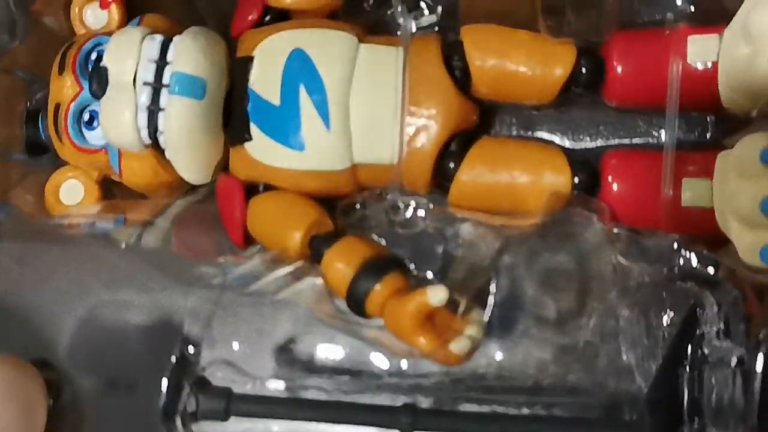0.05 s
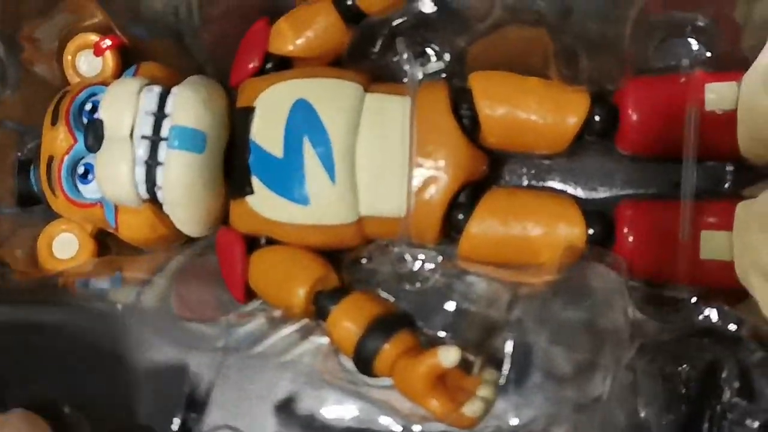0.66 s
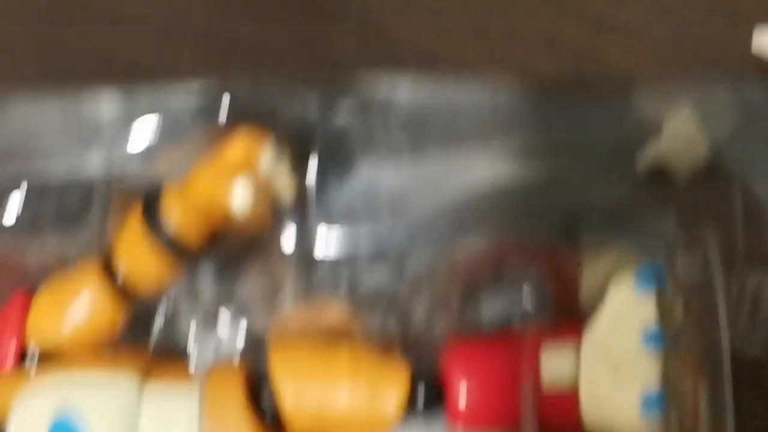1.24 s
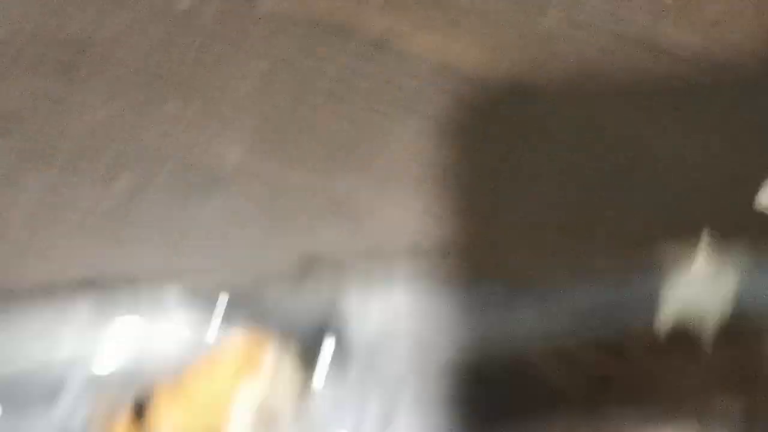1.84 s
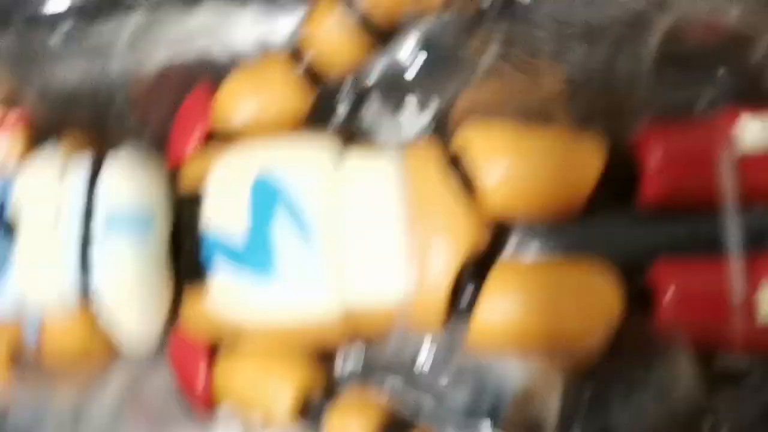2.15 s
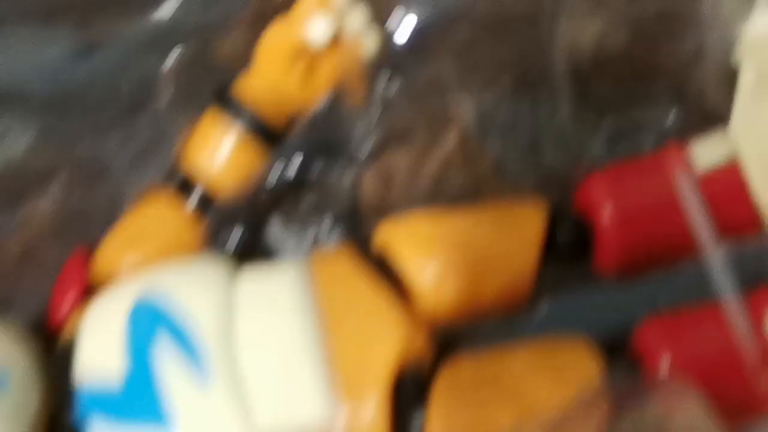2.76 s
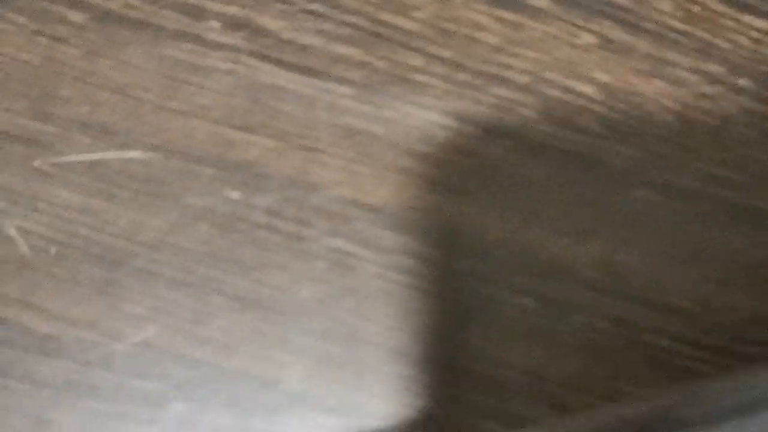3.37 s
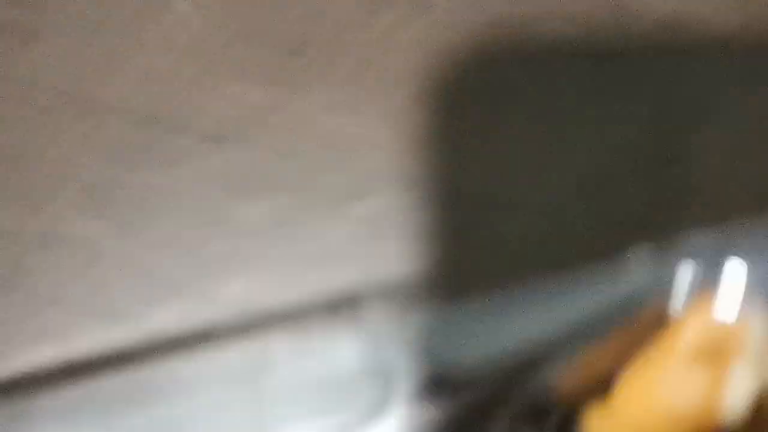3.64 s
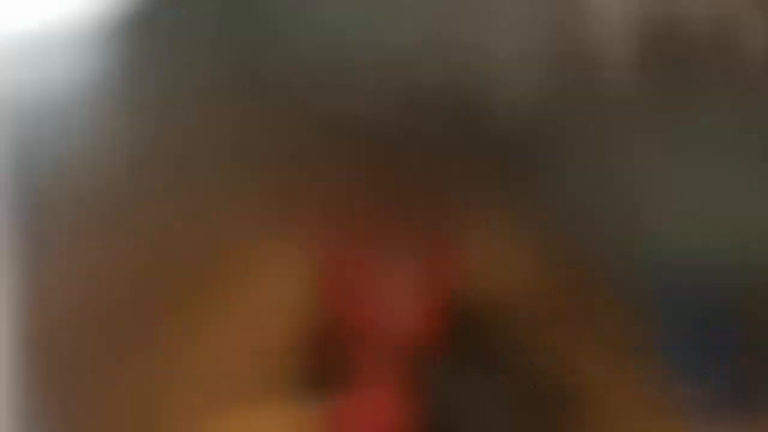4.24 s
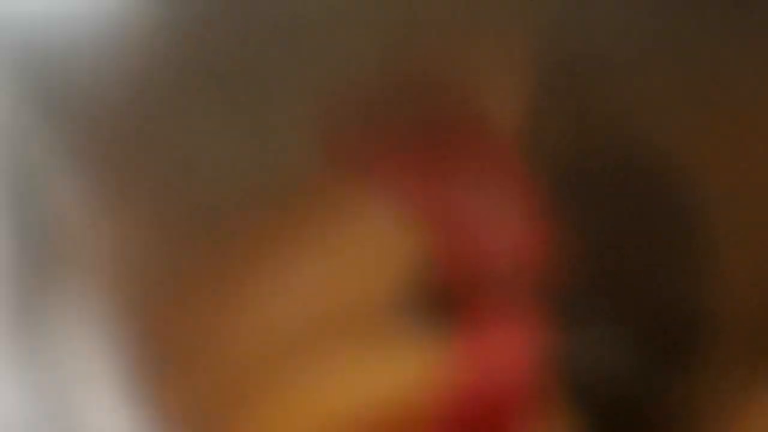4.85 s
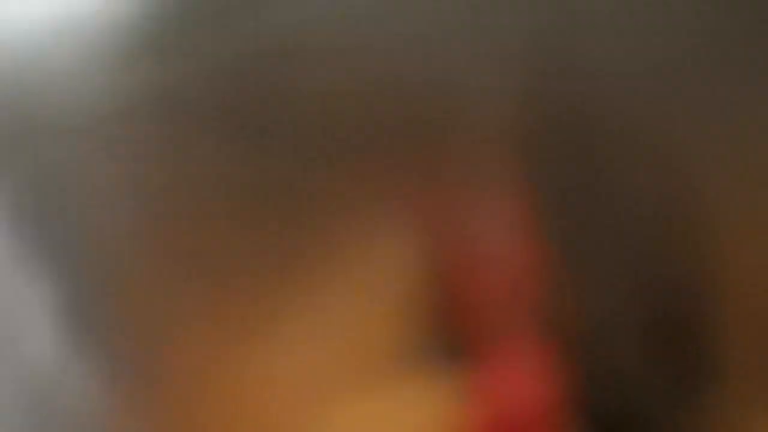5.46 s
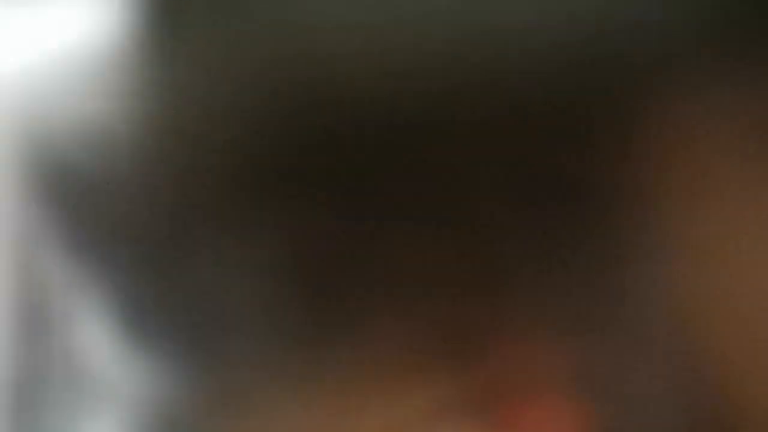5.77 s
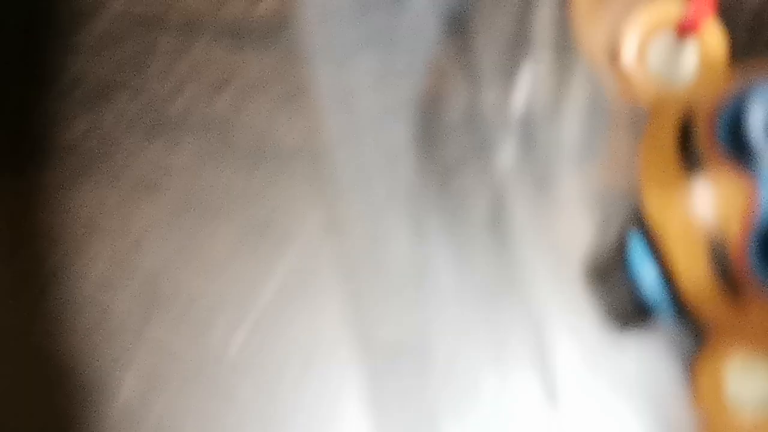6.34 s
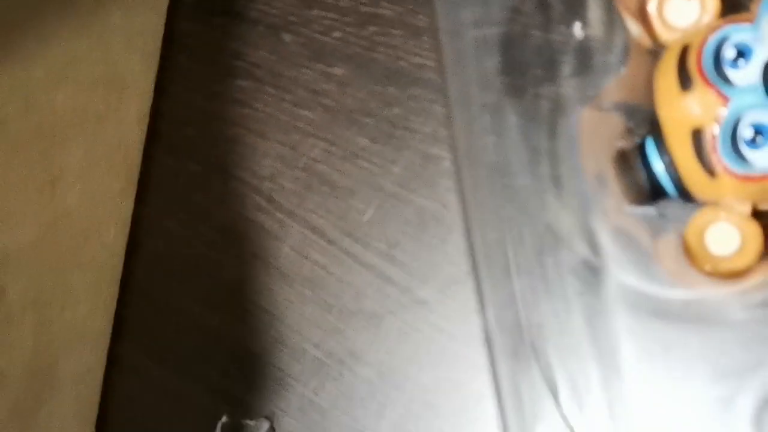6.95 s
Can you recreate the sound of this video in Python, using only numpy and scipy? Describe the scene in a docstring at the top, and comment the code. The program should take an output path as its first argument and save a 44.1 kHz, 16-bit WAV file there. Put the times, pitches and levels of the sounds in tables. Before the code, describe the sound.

A thin plastic tray holding a toy figure is handled in a small room over faint, low room tone. For the first two seconds there are only a few light ticks and short scrapes. From about 2 to 2.8 seconds comes a cluster of louder scrapes, with soft rubbing as fingers slide over the plastic. After a brief lull, steady crinkling starts at about 3.2 seconds, full of small, sharp snaps. From around 4 seconds the tray is right at the microphone and sounds fuller, with soft, dull handling bumps and a couple of louder pops near 4.5 seconds, briefly toward the right. The crackling is densest between about 5.3 and 6 seconds. A last strong scrape, pop and thud come just after 6 seconds, then the crinkling stops abruptly, leaving only room tone until the end at about 7 seconds.

```python
"""Short plastic scrapes and snaps sound over faint room tone: hands turn a thin blister tray near a phone.
The toy inside and the fingers scrape by stick-slip friction; creases snap by buckling.
Both excite the damped modes of the tray's panels and walls, and a small room echoes them.
The tray comes closer and is squeezed harder, so the crinkling thickens; it stops when the tray is let go."""
import sys
import numpy as np
from scipy import signal
from scipy.fft import rfft, irfft
from scipy.io import wavfile

SR = 44100
rng = np.random.default_rng(int(sys.argv[2]) if len(sys.argv) > 2 else 0)


def to_wav(s):
    """Save 16-bit WAV."""
    ch = np.atleast_2d(s).T  # columns
    pcm = np.round(np.clip(ch, -1, 1) * 32767)  # PCM
    wavfile.write(sys.argv[1], SR, pcm.astype(np.int16))


N = 313098
SIZE = 12288  # samples in one short sound
T, AGE = np.arange(N) / SR, np.arange(SIZE) / SR


def undb(db):
    """Amplitude ratio of a level in decibels."""
    return 10 ** (np.asarray(db) / 20)


def unit(x):
    """Normalisation of each channel to unit energy."""
    return x / np.sqrt(np.sum(x ** 2, axis=-1, keepdims=True))


def fade(t, t60):
    """Exponential decay, 60 dB in t60 seconds."""
    return np.exp(-np.log(1000) * t / t60)


def at(curve, t, column=1):
    """Linear interpolation of a curve at time t."""
    columns = np.transpose(curve)
    return np.interp(t, columns[0], columns[column])


def colour(points, size):
    """Magnitude response per FFT bin, interpolated in dB over log frequency."""
    hz, db = np.transpose(points)
    bin_hz = np.arange(size // 2 + 1) * SR / size
    return undb(np.interp(np.log(bin_hz + 1), np.log(hz), db))


def add(out, t, sound, db, pan_db):
    """Constant-power panning of a sound starting at t, with the energy of 10 ms at level db."""
    gains = undb(np.array([[pan_db], [-pan_db]]) / 2)
    gains /= np.sqrt(np.mean(gains ** 2))
    i = int(t * SR)
    out[:, i:i + SIZE] += (unit(sound) * gains * undb(db) * np.sqrt(SR / 100))[:, :N - i]


# spectrum of the room tone: [f/Hz, relative level/dB]
ROOM_SPECTRUM = [(25, 0.5), (140, -1.5), (250, -3), (450, -9), (1000, -13.5), (1500, -22.5), (3000, -25),
                 (4000, -33.5), (5200, -25.5), (7300, -30), (8500, -39), (15000, -37)]
def room_tone(shared=0.8, db=-68):
    """Stationary noise, low with a faint hiss, partly coherent between the channels."""
    noise = rng.standard_normal((3, N))
    spectrum = rfft(noise[:2] + shared * noise[2]) * colour(ROOM_SPECTRUM, N)
    return unit(irfft(spectrum, N)) * np.sqrt(N) * undb(db)


# soft knocks: [t/s, level/dB, f/Hz, t60/s]
BUMPS = [(.914, -54, 59.5, 0.12), (3.262, -50.5, 80, 0.19), (4.15, -46.5, 45, 0.29),
         (4.263, -48, 91.5, 0.14), (4.32, -44, 240, 0.066), (4.541, -32, 140, 0.036),
         (4.815, -43, 190, 0.091), (4.941, -43.5, 330, 0.037), (5.33, -42.5, 140, .15),
         (5.47, -39.5, 190, 0.41), (5.599, -46.5, 159, 0.25), (5.783, -54, 45, 0.2),
         (6.046, -37.5, 79.6, 0.13)]
def bumps():
    """Structure-borne sound: hands and tray meet the phone in dull, damped thuds."""
    out = np.zeros((2, N))
    for t, db, hz, t60 in BUMPS:
        push = rng.standard_normal((2, SIZE)) * fade(AGE, t60)
        band = signal.butter(2, [hz / 2.7, hz * 1.58], "band", fs=SR, output="sos")
        add(out, t, signal.sosfilt(band, push), db, pan_db=-4.5)
    return out


# path of the tray: [t/s, nearness from 0 at arm's length to 1 at the phone]
NEARNESS = [(2.6, 0), (3.8, 0.77), (4.3, 1), (5.8, 0.97), (6.1, 0.81)]
def shade_treble(x, far_loss=0.24):
    """Directivity: short waves miss the microphones off axis while the tray is far."""
    treble = signal.sosfiltfilt(signal.butter(2, 9000, "high", fs=SR, output="sos"), x)
    return x - far_loss * (1 - at(NEARNESS, T)) * treble


# side the tray is held on: [t/s, left minus right level/dB]
BEARING = [(0, 3.5), (2.6, 3), (4.0, 4.5), (4.38, -2.5), (4.58, -9.5), (4.78, -1.5), (5.6, -1), (6.05, -3)]
def spot_pan(t, spread_db=2.5):
    """Level difference of a random spot on the tray, which subtends a wider angle when close."""
    return at(BEARING, t) + spread_db * at(NEARNESS, t) * rng.standard_normal()


# imbalance of the microphone ports: [f/Hz, left minus right level/dB]
PORT_BALANCE = [(200, -3), (400, -3.5), (600, 3), (950, 4), (1400, -1), (2400, -1), (6500, 1.5), (10500, 0)]
def ports(x):
    """Acoustic filtering: each port colours the tray differently, at constant total power."""
    lean = np.sqrt(colour(PORT_BALANCE, N))
    rms = np.sqrt((lean ** 2 + lean ** -2) / 2)
    return irfft(rfft(x) * np.array([lean, 1 / lean]) / rms, N)


# resonances of the plastic sheet: [f/Hz, relative level/dB]
SHEET_SPECTRUM = [(190, -4.5), (280, -5), (400, -1), (520, -5.5), (740, 1.5), (980, 1.5), (1400, -8),
                  (1750, -6), (2540, -8.5), (3200, -9), (4000, -18.5), (5300, -10), (7200, -10.5),
                  (8800, -21), (11500, -27.5), (15000, -29.5)]
def response(part):
    """Minimum-phase response of the sheet, limited to the band of one part."""
    cepstrum = irfft(np.log(colour(SHEET_SPECTRUM, SIZE)))
    cepstrum[1:SIZE // 2] *= 2  # folding makes the response causal
    cepstrum[SIZE // 2 + 1:] = 0
    band = signal.butter(4, part[:2], "band", fs=SR, output="sos")
    return np.exp(rfft(cepstrum)) * rfft(signal.sosfilt(band, signal.unit_impulse(SIZE)))


# vibrating parts of the tray: [low f/Hz, high f/Hz, strongest mode f/Hz, t60/s, echo level/dB]
SHELL = (127, 639, 406.5, 0.25, -15.5)
PANEL = (481, 1500, 772, 0.0051, -10.5)
WALL = (1199.5, 4298.5, 2549, 0.0375, -18)
CREASE = (3699, 15999.5, 6595.5, 0.014, -19.5)
PARTS = SHELL, PANEL, WALL, CREASE
def ring(part, tone, extra_echo_db=0, peak=1.2, q=8, room_t60_s=0.23, room_gap_s=0.012):
    """Modal overlap: one spot's spectrum is decaying noise with one stronger mode and the room's echo."""
    mode_hz, t60, echo_db = part[2:]
    noise = rng.standard_normal((2, SIZE))  # the tray moves, so every echo pattern is new
    crack = 0.47 * fade(AGE, t60=0.0055)
    onset = 1 - fade(AGE, t60=0.0012)  # the sheet takes a moment to flip
    direct = unit((fade(AGE, t60) + crack) * onset)
    echo = undb(echo_db + extra_echo_db) * unit(fade(AGE, room_t60_s) * (AGE > room_gap_s))
    bent_hz = mode_hz * 2 ** rng.uniform(-0.38, 0.32)  # bending retunes the mode
    s = 1j * np.arange(SIZE // 2 + 1) * SR / SIZE / bent_hz
    resonance = 1 + peak * s / (s + q * (s * s + 1))
    return tone * resonance * rfft(noise * np.hypot(direct, echo))


def slips(size, per_s, spread_db):
    """Poisson impulses of log-normal strength: most small, a few large."""
    occurs = rng.random(size) < per_s / SR
    return occurs * undb(spread_db * rng.standard_normal(size)) * rng.choice([-1, 1], size)


def rubbing(part, tone, db):
    """Friction noise: dense tiny slips convolved with the impulse responses of three spots."""
    out = np.zeros((2, N))
    for _ in range(3):
        force = slips(N, per_s=1500, spread_db=6.5)
        out += signal.oaconvolve(force[None], irfft(ring(part, tone, peak=0)), axes=1)[:, :N]
    return unit(out) * np.sqrt(N) * undb(db)


# a finger slides over the sheet: [t/s, duration/s, panel level/dB, crease level/dB]
STROKES = [(0.625, 0.26, -66, -76), (0.944, 0.04, -63, -67), (1.995, 0.2, -55.5, -60),
           (2.269, 0.29, -59, -61.5), (2.691, 0.17, -60.5, -66), (3.168, .42, -61, -66.5),
           (3.751, 0.14, -55, -66), (4.04, 0.17, -62, -61.5), (4.29, 0.054, -58.5, -60.5),
           (4.698, 0.42, -63.5, -67.5), (5.304, 0.37, -56, -56), (5.696, 0.38, -54, -61.5)]
def strokes(tones, attack_s=0.023, t60_s=0.38, shell_db=-6, wall_db=-2):
    """Sliding friction drives every part of the tray; overlapping strokes add in power."""
    panel, crease = np.full((2, N), 1e-7)
    for t, length, panel_db, crease_db in STROKES:
        contact = np.clip((T - t) / attack_s, 0, 1) * fade(np.maximum(T - t - length, 0), t60_s)
        panel = np.hypot(panel, contact * undb(panel_db))
        crease = np.hypot(crease, contact * undb(crease_db))
    panel, crease = 20 * np.log10([panel, crease])
    levels = panel + shell_db, panel, (panel + crease) / 2 + wall_db, crease
    pan_db = at(BEARING, T)
    return sum(map(rubbing, PARTS, tones, levels)) * undb(np.array([pan_db, -pan_db]) / 2)


# strength of the squeeze: [t/s, buckling rate/(1/s), level/dB]
SQUEEZE = [(0, 4.5, -68.5), (3.15, 1.5, -68.5), (3.25, 55, -58), (4.2, 25, -60), (4.7, 30, -57.5),
           (5.2, 55, -55.5), (5.6, 150, -51.5), (6.08, 29.5, -58), (6.12, 0, -67)]
def crinkle(wall_tone, crease_tone, coupling=0.43, spread_db=3, pan_spread_db=6):
    """Crackling noise: tiny creases buckle and nudge a wall, faster and louder under a harder grip."""
    out = np.zeros((2, N))
    for t in T[rng.random(N) < at(SQUEEZE, T) / SR]:
        pop = irfft(ring(CREASE, crease_tone) + coupling * ring(WALL, wall_tone))
        db = at(SQUEEZE, t, column=2) + spread_db * rng.standard_normal()
        pan_db = at(BEARING, t) + pan_spread_db * rng.standard_normal()
        add(out, t, pop, db, pan_db)
    return out


# toy or fingers catch on the sheet: [t/s, duration/s, panel level/dB, crease level/dB]
SCRAPES = [(0.104, 0.02, -47.5, -59), (0.415, 0.012, -56, -79), (0.677, 0.048, -40.5, -52.5),
           (1.591, 0.034, -53.5, -54), (1.767, 0.018, -58.5, -91), (2.032, 0.021, -40, -63),
           (2.114, 0.059, -38, -48), (2.392, 0.038, -31, -53), (2.44, 0.061, -31.5, -55),
           (2.546, 0.038, -28.5, -48), (2.7, .014, -48, -93), (2.737, 0.063, -35.5, -51),
           (2.831, 0.028, -49.5, -78), (3.054, 0.0078, -60, -89), (3.264, .013, -34.5, -61),
           (3.592, 0.036, -48, -59), (3.765, 0.0078, -34.5, -70), (3.793, 0.026, -39.5, -49),
           (4.107, 0.017, -40.5, -63), (4.182, 0.017, -35.5, -60.5), (4.312, 0.016, -38.5, -49),
           (4.366, .015, -40.5, -40.5), (4.494, .016, -37.5, -53), (4.538, 0.026, -35, -60),
           (4.576, 0.0084, -31.5, -35), (4.772, 0.013, -33.5, -45.5), (4.809, 0.022, -39, -61),
           (4.881, .012, -43, -75), (4.936, 0.0073, -38.5, -65), (5.082, 0.011, -34, -42),
           (5.324, 0.012, -34, -44), (5.382, 0.017, -36.5, -41.5), (5.429, 0.033, -37, -60),
           (5.498, 0.017, -33, -54), (5.548, 0.013, -32.5, -47.5), (5.593, 0.011, -30, -41),
           (5.755, 0.013, -42, -58), (5.858, 0.016, -37, -36.5), (5.888, .052, -32, -44),
           (6.006, 0.034, -35.5, -43.5), (6.036, .02, -26, -36), (6.055, 0.017, -37, -62),
           (6.156, 0.015, -44.5, -82)]
def scrapes(tones, shell_far_db=-21.5, shell_near_db=-3, wall_db=0.5):
    """Stick-slip friction: one run of slips swells and dies, shaking all parts of the tray."""
    out = np.zeros((2, N))
    for t, length, panel, crease in SCRAPES:
        progress = np.clip(AGE / length, 0, 1)
        pressure = np.sqrt(np.sin(np.pi * progress ** 0.65).clip(0))
        force = pressure * slips(SIZE, per_s=2500, spread_db=4)
        force[0] += 0.3  # the first slip breaks the grip
        # the bass of the whole shell only carries close up
        shell = panel + shell_far_db + (shell_near_db - shell_far_db) * at(NEARNESS, t)
        levels = shell, panel, (panel + crease) / 2 + wall_db, crease
        pan_db = spot_pan(t)
        for part, tone, db in zip(PARTS, tones, levels):
            add(out, t, irfft(rfft(force) * ring(part, tone)), db, pan_db)
    return out


# a crease buckles: [t/s, panel level/dB, crease level/dB]
CREASE_SNAPS = [(0.378, -49, -49.5), (.6433, -51.5, -65.5), (.8362, -53.5, -57), (0.914, -56, -61),
                (0.9585, -75, -56.5), (1.221, -50, -40.5), (1.447, -76, -62.5), (1.5644, -57.5, -54.5),
                (1.589, -49, -49.5), (2.0076, -60.5, -54.5), (2.395, -30, -49.5), (2.8645, -60, -47.5),
                (3.212, -43.5, -46.5), (3.232, -41, -46.5), (3.327, -44, -44), (3.3694, -44.5, -45),
                (3.3968, -50, -54), (3.4203, -47, -48.5), (3.462, -44, -48), (3.4953, -46.5, -46.5),
                (3.5289, -46, -48), (3.6482, -44, -47.5), (3.7404, -41, -45), (3.7949, -37, -44),
                (3.8854, -38, -59.5), (3.9579, -79, -37), (3.9966, -58, -35.5), (4.0583, -71, -48.5),
                (4.186, -33.5, -62), (4.2984, -51, -45), (4.3714, -39, -39.5), (4.3823, -50, -49),
                (4.404, -41, -45), (4.4973, -34, -40.5), (4.526, -34.5, -41.5), (4.5391, -36, -43),
                (4.6744, -53.5, -48), (4.7041, -47.5, -52), (4.7311, -53, -41), (4.7496, -50, -44),
                (4.7586, -39.5, -40), (4.8683, -48.5, -41), (4.9334, -52, -43.5), (4.9679, -67.5, -47),
                (4.9789, -48.5, -45), (4.994, -66, -45), (5.0223, -46, -39.5), (5.053, -48.5, -40.5),
                (5.0706, -48, -44), (5.0858, -28, -39), (5.1208, -54, -47.5), (5.187, -45.5, -40),
                (5.2049, -48.5, -45.5), (5.2314, -44.5, -41), (5.2524, -36, -41), (5.279, -54, -37.5),
                (5.3251, -39.5, -39.5), (5.3815, -35, -39), (5.4311, -52, -42), (5.4395, -61, -39.5),
                (5.673, -47, -42.5), (5.6832, -49, -41), (5.7579, -48.5, -41.5), (5.7753, -47.5, -30.5),
                (5.783, -70, -30), (5.909, -34.5, -36)]
# a whole side wall pops through: [t/s, wall level/dB]
WALL_POPS = [(4.421, -36), (4.578, -29.5), (5.603, -37), (6.0453, -34.5)]
def snaps(tones, wall_db=-4, pop_panel_db=-7.5, pop_crease_db=-2.5, far_echo_db=3.5):
    """Snap-through buckling rings a panel, a wall and a crease; a popping wall outrings the other two."""
    out = np.zeros((2, N))
    buckles = [(t, panel, (panel + crease) / 2 + wall_db, crease) for t, panel, crease in CREASE_SNAPS]
    pops = [(t, wall + pop_panel_db, wall, wall + pop_crease_db) for t, wall in WALL_POPS]
    for t, *levels in buckles + pops:
        pan_db = spot_pan(t)
        extra_echo_db = far_echo_db * (1 - at(NEARNESS, t))
        for part, tone, db in zip(PARTS[1:], tones[1:], levels):
            add(out, t, irfft(ring(part, tone, extra_echo_db)), db, pan_db)
    return out


def scene():
    """Superposition of the tray, heard through the microphone ports, with bumps and room tone."""
    tones = [response(part) for part in PARTS]
    tray = snaps(tones) + scrapes(tones) + crinkle(*tones[2:]) + strokes(tones)
    return shade_treble(ports(tray)) + bumps() + room_tone()


def record(dry, cutoff_hz=16200):
    """Band limiting: the phone's steep low-pass cuts the top of the treble."""
    return signal.sosfilt(signal.ellip(8, 0.2, 70, cutoff_hz, fs=SR, output="sos"), dry)


dry = scene()
out = record(dry)
to_wav(out)
```